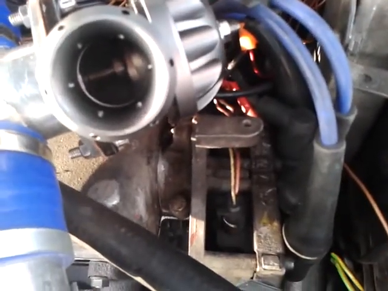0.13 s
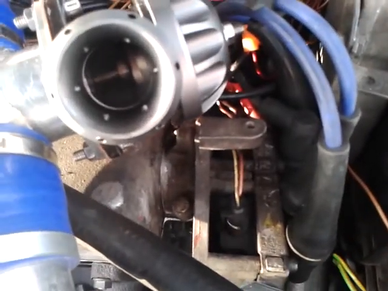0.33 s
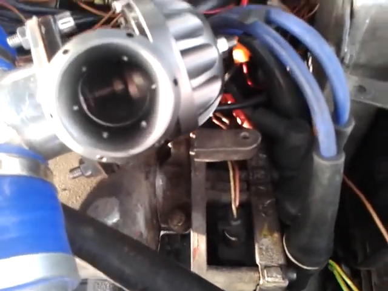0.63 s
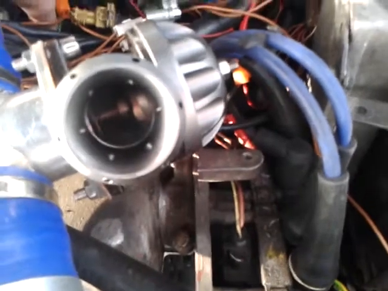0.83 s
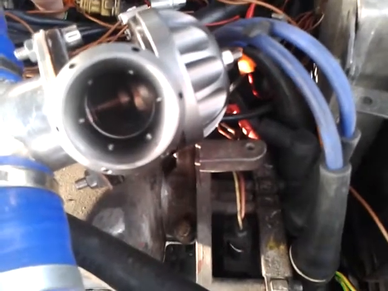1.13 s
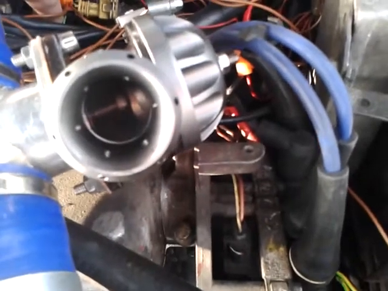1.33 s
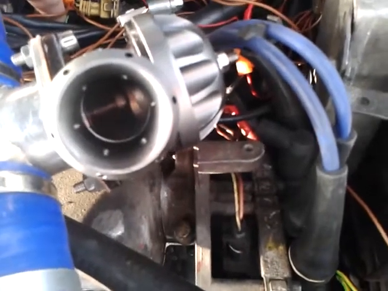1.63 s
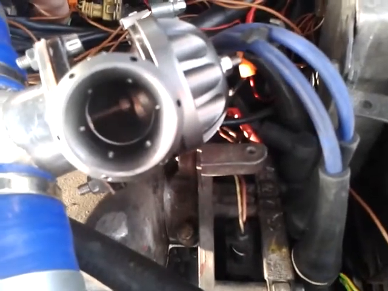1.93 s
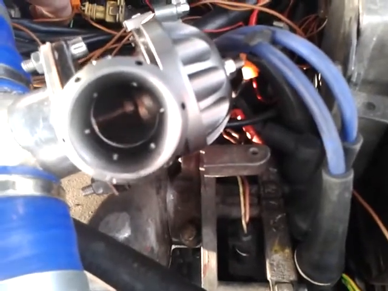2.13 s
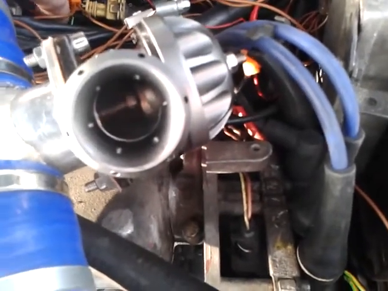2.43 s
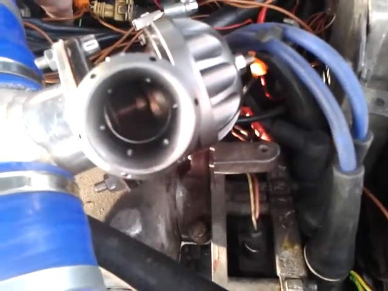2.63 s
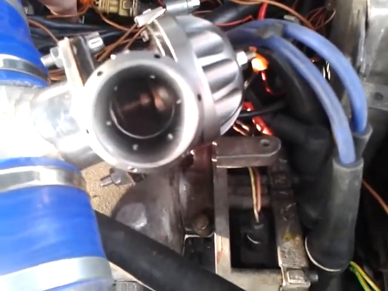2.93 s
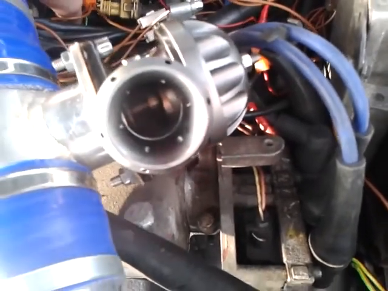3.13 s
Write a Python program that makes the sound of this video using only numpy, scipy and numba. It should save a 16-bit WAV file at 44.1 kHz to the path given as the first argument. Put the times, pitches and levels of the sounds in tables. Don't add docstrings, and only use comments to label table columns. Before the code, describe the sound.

A turbo blow-off valve over a running engine, heard very close on a phone. Muffled rattling fast idle opens up around 0.45-0.6 s as a finger leaves the microphone, with small air puffs. From 0.9 to 2 s it idles slowly with sharp metallic ticks, clatter and faint whine. Revs climb from 2 s, peaking at 2.5 s; roar and hiss burst into loud, bright, clipped air, easing slightly until 3.27 s as revs fall.

```python
import sys
import numpy as np
from scipy import signal
from scipy.fft import rfft, irfft
from scipy.io import wavfile
from scipy.ndimage import uniform_filter1d
from numba import njit

SR = 44100
rng = np.random.default_rng(int(sys.argv[2]) if len(sys.argv) > 2 else 0)


def undo_db(level):
    steps = np.asarray(level, float) / 20
    return 10 ** steps


def file_out(sig):
    cols = np.atleast_2d(sig).T
    lim = np.clip(cols, -1, 1)
    pcm = np.round(lim * 32767).astype(np.int16)
    wavfile.write(sys.argv[1], SR, pcm)


N = 144207
t = np.arange(N) / SR

# [t/s, firing rate f/Hz, gear level/dB, throttle/0-1]
ENGINE_RUN = [(0, 41.93, -12, 0.45), (.3, 45.84, -12.5, 0.63), (.5, 46.03, -10.5, 0.69),
              (.7, 43.76, -12, 0.07), (.9, 37.36, -12.5, 0), (1.08, 33.64, -13.5, 0.03),
              (1.8, 33.71, -15.5, 0.13), (2.0, 41.5, -12, 0.1), (2.13, 52.16, -12.5, 0.5),
              (2.3, 80.53, -11, 0.81), (2.4, 101.9, -11.5, 0.93), (2.5, 119, -2, 0.83),
              (2.57, 115.3, -10.5, 0.47), (2.75, 105.2, -12, 0.62), (3.0, 93.05, -8, 0.19),
              (3.27, 84.3, -10, .1)]
# [f/Hz, width/Hz, level/dB]
PIPE_MODES = [(111, 180, -23), (267, 63, -3), (355, 84, 3.5), (571, 87, 10), (820, 140, -5)]
# [multiple of firing rate, level/dB]
THROB_PARTIALS = [(1, 0), (1.5, -3), (2, -3)]
# [f/Hz, level/dB]
GEAR_COLOUR = [(60, -48), (150, -15.5), (400, 4), (1000, 2.5), (2000, 4), (3500, 5), (8000, -23),
               (16000, -89)]
# [t/s, level/dB]
WHINE_LOAD = [(0, -1.5), (1.0, -0.5), (1.1, -1.5), (1.25, -8), (1.36, -1), (1.78, 0), (1.9, -6)]
# [t/s, level/dB]
AIR_FLOW = [(0, -20), (.55, -19), (.66, -13), (.9, -18.5), (1.2, -22.5), (1.9, -20), (2.09, -13),
            (2.17, -7), (2.3, -3.5), (2.46, -3), (2.52, -5.5), (2.58, 0.5), (2.85, -1), (3.1, -4),
            (3.145, -6), (3.17, -5), (3.27, -5.5)]
# [f/Hz, level/dB]
JET_COLOUR = [(110, -45), (300, 1.5), (700, 11.5), (2500, 15.5), (4000, 16), (6000, 0), (9000, 13.5),
              (16000, 4.5)]
# [f/Hz, width/Hz, level/dB]
MOUTH_MODES = [(1370, 170, 4), (3080, 250, 7), (3880, 100, 3), (4340, 72, 2), (5180, 72, 5), (5513, 83, 7),
               (6274, 140, 7.5), (6740, 110, 5)]
# [f/Hz, width/Hz, level/dB]
BODY_MODES = [(3500, 75, 10), (4950, 71, 3), (5260, 76, 3.5), (5900, 210, 8), (6280, 140, 5.5),
              (6680, 130, 3)]
# [f/Hz, level/dB]
RUMBLE_COLOUR = [(20, -2), (70, 0), (110, -12), (200, -50)]
# [t/s, level/dB]
GRIP_THUMPS = [(.62, -52), (.75, -48), (1.4, -56), (1.924, -40)]
# [t/s, peak level/dB]
SEAT_TICKS = [(0.8976, -1.5), (0.9833, -0.5), (1.039, 2), (1.097, 2), (1.1566, 4), (1.2176, -1),
              (1.2739, -1.5), (1.3339, 0), (1.393, 4), (1.453, 0), (1.512, 3), (1.5718, 0), (1.6323, 3),
              (1.6922, 4), (1.7527, 9.5), (1.8111, 4), (1.8688, 5.5), (1.923, 8), (1.9746, 7.5),
              (2.0228, 5.5), (2.0672, 5.5), (2.109, 3), (2.1453, 5)]
# [t/s, peak level/dB]
TAPPET_TICKS = [(0.0583, -19), (0.1733, -11), (0.3496, -7), (0.3736, -8), (0.417, -9), (0.438, -8),
                (0.5, -1), (0.5214, -3), (0.599, -4), (0.621, 0), (1.0083, -2), (1.1252, -0.5),
                (1.1854, -3.5), (1.2454, -1), (1.304, -0.5), (1.364, -0.5), (1.4213, 1.5), (1.482, 0),
                (1.5424, -3), (1.6013, 1), (1.6624, -0.5), (1.72, -2), (1.782, -2), (1.8397, -3),
                (1.8978, -10), (1.949, -3)]
# [t/s, peak level/dB]
LOOSE_RATTLES = [(0.0266, -2.5), (0.1221, -19), (0.2112, -1), (0.3007, -4), (0.384, -1.5), (0.4697, 4),
                 (0.5554, 5.5), (0.6463, 8), (0.7389, 6), (0.8365, 6), (0.9456, 6), (1.0593, 6),
                 (1.1794, 3), (1.2969, 4), (1.414, 4), (1.5372, 5), (1.6546, 3.5), (1.7744, -2),
                 (1.8883, 3.5), (1.992, 4), (2.0824, 3)]
# [t/s, peak level/dB]
BRIGHT_CRACKS = [(0.0106, -17.5), (0.0577, -20), (0.1051, -19), (0.151, -20), (0.196, -18), (0.2124, -19),
                 (0.2408, -29), (0.2837, -27), (0.3014, -24), (0.3276, -29), (0.3715, -33), (0.3864, -21),
                 (0.4144, -31), (0.471, -17), (0.558, -14), (0.6014, -19.5), (0.6463, -28), (0.7395, -13.5),
                 (0.7932, -20), (0.8389, -22), (0.9256, -23), (0.9451, -29), (1.2354, -31), (1.2958, -32),
                 (1.4139, -29)]
# [t/s, peak level/dB]
INJECTOR_PINGS = [(0.9291, -9), (1.0086, -14), (1.118, -7), (1.2352, -4), (1.3538, -7), (1.4727, -7),
                  (1.5333, -14), (1.5932, -9), (1.7117, -9), (1.8399, -9), (1.896, -8)]
# [f/Hz, level/dB]
TICK_COLOUR = [(500, -28), (1500, 0.5), (2600, 3.5), (4000, 8), (6000, -4.5), (8000, -0.5), (11000, 4.5),
               (16000, -25)]
# [f/Hz, level/dB]
KNOCK_COLOUR = [(500, -9.5), (1500, -7), (2600, 1.5), (3500, 8.5), (5000, -12), (7000, -13.5),
                (10000, -9.5), (16000, -53)]
# [f/Hz, level/dB]
CRACK_COLOUR = [(1500, -25), (3000, -16), (4900, -2), (6000, -4), (7500, 1), (11000, -2), (16000, -1)]
# [f/Hz, width/Hz, level/dB]
SHELL_MODES = [(3430, 480, -6), (3686, 140, -2.5), (5200, 160, 8)]
# [t/s, length/s, level/dB, f/Hz]
AIR_PUFFS = [(0.207, 0.18, -32, 236), (0.619, 0.044, -28, 172), (0.884, 0.062, -30, 300),
             (1.347, 0.083, -26, 300.5), (1.409, 0.074, -24, 372), (1.496, 0.13, -30.5, 259),
             (1.574, 0.033, -38, 184), (0.74, 0.13, -34, 60.8), (2.51, 0.036, -27, 300)]
# [f/Hz, width/Hz, level/dB]
BAY_MODES = [(570, 90, 4), (760, 80, 4), (910, 70, 4), (1290, 120, 5), (1665, 80, 6), (2350, 100, 4),
             (3390, 100, 7), (3935, 110, 7), (4880, 120, 5), (5300, 90, 4), (5620, 100, 6), (5900, 90, 5),
             (6320, 100, 5), (6740, 90, 4)]
# [f/Hz, width/Hz, level/dB]
GAP_MODES = [(5300, 120, 4), (9570, 110, 7), (11300, 150, 4), (3320, 220, 3), (5600, 3000, 5),
             (10500, 5000, -4)]
# [t/s, f/Hz]
SLIT_GLIDE = [(.22, 7950), (.305, 7900), (.315, 6950), (.37, 6700), (.41, 6300), (.45, 4600)]

EXHAUST_DB, ROAR_DB, THROB_DB = -37, 24.5, -27
WHINE_DB, WHINE_ORDER = -23.5, 38
VALVE_OPENS_S, MOUTH_RISE_PER_S = 2.54, 0.015
RUMBLE_DB = -72
SEAT_DB, TAPPET_DB, RATTLE_DB, CRACK_DB = -8, -8.5, -13, 5.5
PING_DB, SPIT_DB, SHELL_DB = -11, -20, -10
REBOUND_S, REBOUND_DB = 0.0071, -2.5
FAST_FROM_S, FAST_TICK_DB, MERGE_DB_PER_S = 2.17, -3.5, -45
UNCOVER_S, SLIDE_S, SLIDE_POWER = 0.44, 0.16, 2.15
CAVITY_HZ, CAVITY_DB, SLIT_DB = 1560, 8, 13
COVERED_HZ, OPEN_HZ, PORT_SHARP = 3300, 5852, 2.216
PORT_DB, COVERED_PORT_DB, LEAK_DB, LEAK_GROWS_DB = 16, -44, 0.5, 27
DRIVE_DB, CLIP, KNEE, SAG, SAG_S, TOP_HZ = -10, 0.7, 6, 0.42, 0.04, 15700


def curve(table, col):
    rows = np.array(table)
    return np.interp(t, rows[:, 0], rows[:, col])


def unit(x):
    return x / np.sqrt(np.mean(x ** 2))


@njit
def svf(x, hz, k):
    band, low = np.empty(len(x)), np.empty(len(x))
    b, l = 0., 0.
    for i in range(len(x)):
        g = np.tan(np.pi * hz[i] / SR)
        v = (b + g * (x[i] - l)) / (1 + g * (g + k))
        band[i], low[i] = k * v, l + g * v
        b, l = 2 * v - b, l + 2 * g * v
    return band, low


def ring(x, hz, width_hz):
    return svf(x, hz + 0 * t, 1. * width_hz / np.mean(hz))[0]


def resonate(x, modes, share=1, bend=1):
    return x + share * sum((undo_db(db) - 1) * ring(x, f * bend, w) for f, w, db in modes)


def noise(colour):
    f = np.arange(N // 2 + 1) * SR / N + 1
    c = np.array(colour)
    gain = undo_db(np.interp(np.log(f), np.log(c[:, 0]), c[:, 1]))
    return unit(irfft(rfft(rng.standard_normal(N)) * gain, N))


def walk(rate_hz):
    k = int(SR / rate_hz)
    steps = np.repeat(rng.standard_normal(N // k + 1), k)
    return 0.83 * uniform_filter1d(uniform_filter1d(steps, k), k)[:N]


def bursts(rows, rise_s, hold_s, fall_s):
    env, u = np.zeros(N), np.arange(3000) / SR
    shape = np.clip(u / rise_s, 0, 1) * np.exp(-np.maximum(u - rise_s - hold_s, 0) / fall_s)
    for s, db in rows:
        i = int(s * SR)
        env[i:i + len(u)] += (undo_db(db) * shape)[:N - i]
    return env


def exhaust(phase, throttle):
    count = phase.astype(int)
    size = undo_db(1.2 * rng.standard_normal(N // 100)[count] - 3.4 * (count % 2))
    pulse = 30 * np.diff(count, prepend=0)
    rush = 0.53 * np.exp(-(phase % 1) / 1.4) * rng.standard_normal(N)
    gas = size * (pulse + rush)
    pipes = unit(sum(undo_db(db) * ring(gas, f, w) for f, w, db in PIPE_MODES))
    return pipes * undo_db(EXHAUST_DB + ROAR_DB * throttle)


def throb(phase, hz, throttle):
    tone = sum(undo_db(db) * np.sin(2 * np.pi * m * phase) for m, db in THROB_PARTIALS)
    level_db = THROB_DB + 8 * np.log2(hz / 110) + 9 * (throttle - 0.8)
    return ring(tone * undo_db(level_db), 115, 70)


def running_gear(phase):
    beat_db = -5. * (2 * phase % 1) + 2. * walk(90) + 0.5 * walk(21)
    return undo_db(curve(ENGINE_RUN, 2) + beat_db) * noise(GEAR_COLOUR)


def alternator(phase):
    tone = np.sin(2 * np.pi * WHINE_ORDER * phase + 1.2 * walk(25))
    level_db = WHINE_DB + curve(WHINE_LOAD, 1) + 1.2 * walk(8.5)
    return ring(tone * undo_db(level_db), 1320, 410)


def fast_ticks(phase):
    at_s = t[np.flatnonzero(np.diff(phase.astype(int) // 2))]
    rows = [(s, FAST_TICK_DB + MERGE_DB_PER_S * (s - FAST_FROM_S)) for s in at_s if s > FAST_FROM_S]
    return bursts(rows, 0.00054, 0.0034, 0.0059) * noise(TICK_COLOUR)


def engine():
    hz, throttle = curve(ENGINE_RUN, 1), curve(ENGINE_RUN, 3)
    phase = np.cumsum(hz) / SR
    steady = exhaust(phase, throttle) + throb(phase, hz, throttle) + running_gear(phase)
    return steady + alternator(phase) + fast_ticks(phase)


def blow_off():
    jet = undo_db(curve(AIR_FLOW, 1) + 0.15 * walk(25.3) + 0.76 * walk(150)) * noise(JET_COLOUR)
    lift = np.clip((t - VALVE_OPENS_S) / 0.012, 0, 1)
    bend = 1 + MOUTH_RISE_PER_S * (t - 2.9) + 0.0063 * walk(8.9)
    late = np.clip((t - 2.95) / 0.2, 0, 1)
    jet = resonate(jet, [(5530, 200, 3.8)], late)
    jet = resonate(jet, MOUTH_MODES, lift, bend)
    return resonate(jet, BODY_MODES, 1 - 0.56 * lift)


def handling():
    thumps = sum(undo_db(db) * np.exp(-((t - s) / 0.005) ** 2) for s, db in GRIP_THUMPS)
    return undo_db(RUMBLE_DB + 5 * walk(11.5)) * noise(RUMBLE_COLOUR) + thumps


def valve_seats():
    seats = undo_db(SEAT_DB) * bursts(SEAT_TICKS, 0.0001, 0.001, 0.0045) * noise(TICK_COLOUR)
    cracks = undo_db(CRACK_DB) * bursts(BRIGHT_CRACKS, 0.00039, 0.0017, 0.0035) * noise(CRACK_COLOUR)
    spit_noise = noise([(6000, -33), (9000, 0), (16000, 2)])
    spits = undo_db(SPIT_DB) * bursts(SEAT_TICKS, 0.0002, 0.003, 0.004) * spit_noise
    return seats + cracks + spits


def loose_part():
    strikes = LOOSE_RATTLES + [(s + REBOUND_S, db + REBOUND_DB) for s, db in LOOSE_RATTLES]
    knocks = undo_db(RATTLE_DB) * bursts(strikes, 0.0014, 0.0018, 0.0037) * noise(KNOCK_COLOUR)
    shell = sum(undo_db(db + SHELL_DB) * ring(knocks, f, w) for f, w, db in SHELL_MODES)
    return knocks + 3 * shell


def tappets():
    colour = 0.3 * noise(TICK_COLOUR) + 1.4 * noise(KNOCK_COLOUR)
    return undo_db(TAPPET_DB) * bursts(TAPPET_TICKS, 0.0002, 0.0015, 0.0045) * colour


def injectors():
    click = unit(ring(rng.standard_normal(N), 5140, 1400))
    return undo_db(PING_DB) * bursts(INJECTOR_PINGS, 0.001, 0.00093, 0.002) * click


def buffets():
    grain_db = 4 * walk(70)
    total = np.zeros(N)
    for s, length_s, db, f in AIR_PUFFS:
        puff = unit(ring(ring(rng.standard_normal(N), f, f), f, f))
        total += undo_db(db + grain_db) * np.exp(-((t - s) / length_s * 2) ** 2) * puff
    return total


def scene():
    metal = engine() + valve_seats() + loose_part() + tappets() + injectors()
    bay = 0.89 * resonate(metal, BAY_MODES) + blow_off() + undo_db(5.0) * buffets()
    return np.tile(bay, (2, 1))


def finger_on_port(x):
    open_ = np.clip((t - UNCOVER_S) / SLIDE_S, 0, 1)
    y = resonate(x, [(CAVITY_HZ, 800, CAVITY_DB)] + GAP_MODES, 1 - open_)
    rolling = (t < SLIT_GLIDE[-1][0]) * (t > SLIT_GLIDE[0][0])
    y = y + rolling * undo_db(SLIT_DB) * svf(x, curve(SLIT_GLIDE, 1), 0.015)[0]
    hz = COVERED_HZ + (OPEN_HZ - COVERED_HZ) * open_
    port = svf(svf(y, hz, 1 / PORT_SHARP)[0], hz, 1 / PORT_SHARP)[0]
    y = y + (undo_db(COVERED_PORT_DB) + undo_db(PORT_DB) * open_ ** SLIDE_POWER) * port
    leak = ring(ring(x, OPEN_HZ, 2200), OPEN_HZ, 2400)
    return y + undo_db(LEAK_DB + LEAK_GROWS_DB * open_) * (1 - open_) * leak


def preamp(x):
    x = x * undo_db(DRIVE_DB)
    top = CLIP - SAG * uniform_filter1d(np.minimum(np.abs(x), CLIP), int(SAG_S * SR))
    return x / (1 + np.abs(x / top) ** KNEE) ** (1 / KNEE)


def roll_off(x):
    return signal.sosfilt(signal.butter(12, 16580, fs=SR, output="sos"), x)


def record(dry):
    x = preamp(finger_on_port(dry[0]))
    x = signal.sosfilt(signal.butter(4, 125, "high", fs=SR, output="sos"), x) + handling()
    x = signal.sosfilt(signal.ellip(10, 0.2, 70, TOP_HZ, fs=SR, output="sos"), x)
    return roll_off(np.tile(x, (2, 1)))


dry = scene()
out = record(dry)
file_out(out)
```